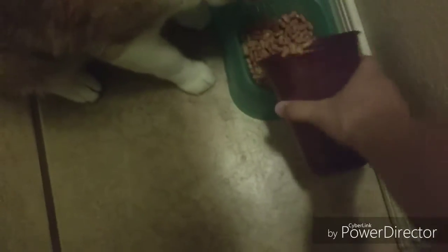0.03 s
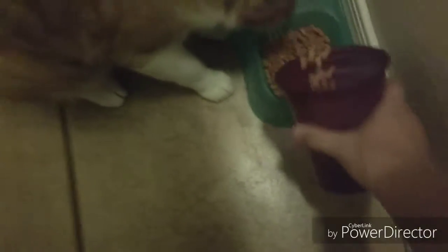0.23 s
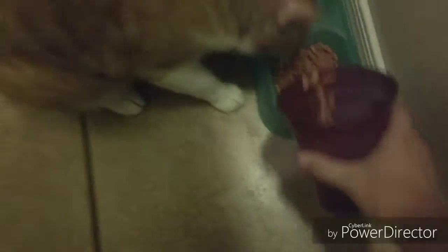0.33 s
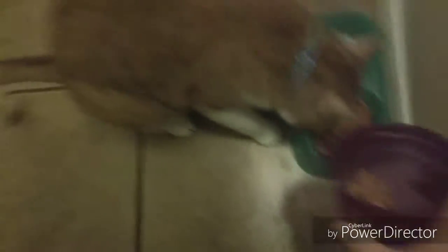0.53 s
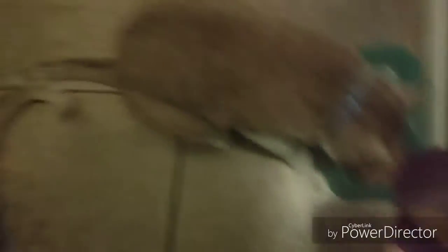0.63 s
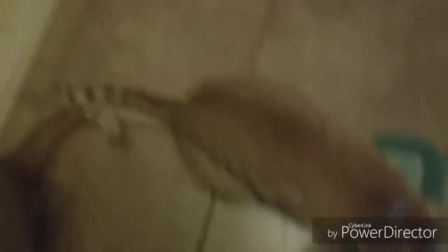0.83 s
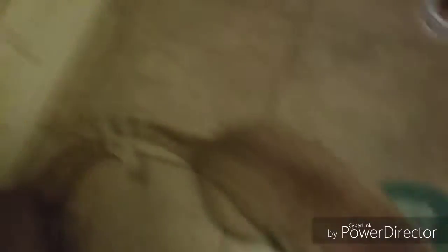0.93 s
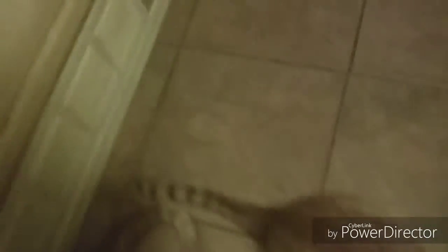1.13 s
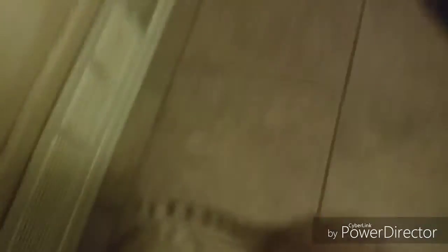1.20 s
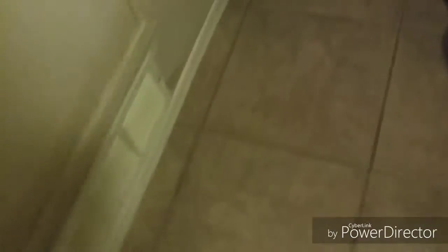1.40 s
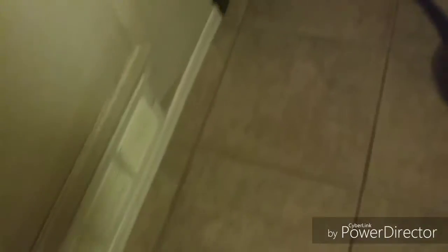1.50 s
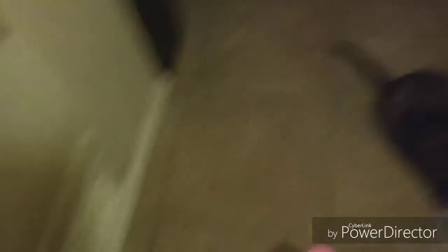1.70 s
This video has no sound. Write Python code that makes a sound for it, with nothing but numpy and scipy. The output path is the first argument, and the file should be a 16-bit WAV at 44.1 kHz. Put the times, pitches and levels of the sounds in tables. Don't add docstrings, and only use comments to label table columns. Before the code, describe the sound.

Dry pellets rattle from a plastic cup into a plastic bowl, starting at once, dipping near 0.2 s, then growing denser. Hollow knocks and hard clacks are strongest at 0.75-0.8 s, with another at 0.96 s. Metal clinks at 0.24, 0.73 and 1.18 s; a tiny tag tinkles near 1.29 s amid gritty foot scuffs. Faint ticks follow from 1.46 to 1.7 s. Close microphone, short tiled echo, faint hiss.

```python
import sys
import numpy as np
from scipy import signal
from scipy.fft import rfft, irfft
from scipy.io import wavfile

SR = 44100
rng = np.random.default_rng(int(sys.argv[2]) if len(sys.argv) > 2 else 0)


def dump(signal):
    limited = np.clip(np.atleast_2d(signal).T, -1, 1)
    pcm = np.round(limited * 32767).astype(np.int16)
    wavfile.write(sys.argv[1], SR, pcm)


def decibels_to_gain(level_db):
    exponent = np.asarray(level_db, float) / 20
    return 10 ** exponent


N = 77175

# pitch_hz [Hz], level_db [dB], t60_s [s to fade by 60 dB]
HOLLOW_MODES = [(586, -9.5, 0.054), (671.7, -4.5, 0.053), (784, -3.5, 0.045), (973, -13, 0.049)]
# pitch_hz [Hz], level_db [dB], t60_s [s]
SNAP_MODES = [(4900, -5, .011), (5600, 2.5, .008), (6250, 2.5, .010)]
# pitch_hz [Hz], level_db [dB], t60_s [s]
RIM_MODES = [(2850, 4, .012), (3350, 6, .014), (4200, 3, .010)]
# pitch_hz [Hz], level_db [dB]
GRIT_COLOUR = [(650, -53), (1100, -11.5), (1420, -16), (1590, -13), (5300, -10), (6120, -0.5),
               (7550, -19.5), (15500, -33)]

CONTACT_S = 0.0003
BODY_FLOOR_HZ, PORT_EDGE_HZ = 530, 6900


def rms_one(x):
    return x / np.sqrt(np.mean(x ** 2) + 1e-20)


def cut(x, hz, kind):
    return signal.sosfilt(signal.butter(4, hz, kind, fs=SR, output="sos"), x)


def coloured(x, points):
    hz, db = np.transpose(points)
    grid = np.maximum(np.fft.rfftfreq(4096, 1 / SR), 10)
    cepstrum = irfft(np.log(decibels_to_gain(np.interp(np.log(grid), np.log(hz), db))))
    cepstrum[1:2048] *= 2
    cepstrum[2049:] = 0
    return signal.fftconvolve(x, irfft(np.exp(rfft(cepstrum))))[:N]


def ring(x, hz, t60):
    r = decibels_to_gain(-60 / (t60 * SR))
    w = 2 * np.pi * min(hz, 0.45 * SR) / SR
    return signal.lfilter([0, np.sin(w)], [1, -2 * r * np.cos(w), r * r], x + 1e-18)


def strike(s, db, modes, contact_s, scatter_db, detune=0, twin=0.77):
    phase_scatter, stagger_s = 0.7, 0.0007
    out = np.zeros(N + SR)
    for hz, level_db, t60 in modes:
        n = np.arange(int(min(1.3 * t60 + 8 * contact_s, 0.9) * SR))
        t = n / SR
        luck = rng.standard_normal((len(s), 5))[:, :, None]
        own_hz = hz * (1 + detune * luck[:, 1])
        twin_hz = own_hz + 6.0 / t60 * luck[:, 3]
        wave = np.sin(2 * np.pi * own_hz * t + phase_scatter * luck[:, 2])
        wave = wave + twin * np.sin(2 * np.pi * twin_hz * t + phase_scatter * luck[:, 4])
        late = stagger_s * rng.random((len(s), 1)) * (detune > 0)
        fade = decibels_to_gain(np.asarray(db)[:, None] + level_db - 6 + scatter_db * luck[:, 0] - 60 * t / t60)
        rise = (1 - np.exp(-t / contact_s)) ** 2
        start = ((np.asarray(s)[:, None] + late) * SR).astype(int)
        np.add.at(out, start + n, wave * fade * rise)
    return out[:N]


def grains(per_s):
    spread_db, clump_db = 3.6, 2.3
    slow = rng.standard_normal(N // 300 + 2)
    clump = rms_one(np.interp(np.arange(N) / 300, np.arange(N // 300 + 2), slow))
    sizes = decibels_to_gain(spread_db * np.minimum(rng.exponential(1, N), 3)) * rng.choice([-1, 1], N)
    return sizes * decibels_to_gain(clump_db * clump) * (rng.random(N) < per_s / SR)


def room(x):
    t60_s, level_db, cut_hz, gap_s = 0.18, -12, 4900, 0.00317
    t = np.arange(SR // 2) / SR
    tail = rng.standard_normal(len(t)) * decibels_to_gain(-60 * t / t60_s) * (t > gap_s)
    tail = signal.sosfilt(signal.butter(1, cut_hz, fs=SR, output="sos"), tail)
    return decibels_to_gain(level_db) * signal.fftconvolve(x, tail / np.linalg.norm(tail))[:N]


def rattle():
    # start_s [s], level_db [dB], hollow_db [dB]
    loudness = [(0, -40.5, -43.5), (.13, -48.5, -68.5), (0.221, -50.5, -65), (.3, -43.5, -60),
                (.45, -42, -52.5), (.5, -47.5, -58), (.6, -40, -49.5), (.7, -42, -53.5), (0.848, -41, -49),
                (.94, -63, -67.5), (1.15, -59, -74), (1.449, -66, -71.5), (1.75, -73.5, -101)]
    # pitch_hz [Hz], level_db [dB]
    pellet_colour = [(590, -8.5), (1000, -12), (1480, -8.5), (1620, -10.5), (3220, -9.5), (4700, -10.5),
                     (6260, -2.5), (8250, -33), (15500, -43.5)]
    pellets_per_s, boom_hits_per_s, ring_cycles = 2000, 350, 18.0
    base_hz, base_db = 380, -17

    hits = grains(pellets_per_s)
    dealt = rng.integers(0, 24, N)
    hush = 0.1 * rng.standard_normal(N)
    rings = np.zeros(N)
    for k, hz in enumerate(np.geomspace(1000, 15500, 24)):
        push = hits * ((dealt - k) % 8 == 0) + hush * hz / 9000
        rings += ring(ring(push, hz, ring_cycles / hz), hz, 3.5 / hz) * hz ** 1.95
    rings = cut(coloured(rings, pellet_colour), BODY_FLOOR_HZ, "high")
    rings = rms_one(rings + decibels_to_gain(-1) * room(rings))

    boom = np.zeros(N)
    for hz, level_db, t60 in HOLLOW_MODES:
        boom += decibels_to_gain(level_db) * ring(ring(grains(boom_hits_per_s), hz, t60), hz, 2.0 / hz) * hz
    base = ring(ring(boom, base_hz, 0.02), base_hz, 0.02)
    base = rms_one(base * cut(rng.standard_normal(N), 60, "low"))
    boom = rms_one(cut(boom, BODY_FLOOR_HZ, "high")) + decibels_to_gain(base_db) * base

    s, db, hollow_db = np.transpose(loudness)
    t = np.arange(N) / SR
    return decibels_to_gain(np.interp(t, s, db) - 3.0) * rings + decibels_to_gain(np.interp(t, s, hollow_db)) * boom


def floor_noise():
    # pitch_hz [Hz], level_db [dB]
    hiss_colour = [(25, -6.5), (120, -5.5), (350, -12), (700, -7), (1100, -19), (4800, -23.5),
                   (6200, -18.5), (7600, -24.5), (15500, -23.5)]
    return decibels_to_gain(-69.5) * rms_one(coloured(rng.standard_normal(N), hiss_colour))


def taps():
    # start_s [s], level_db [dB],
    # pitch_hz [Hz]
    tap_list = [(.001, -42.5, 428), (.045, -42.5, 412), (.145, -51, 380), (.2, -59, 428), (.295, -58, 300),
                (.458, -48.5, 348), (.665, -49, 450), (.676, -51.5, 280), (.748, -46.5, 409),
                (.095, -34, 1430), (0.839, -31.5, 1600), (1.237, -49, 1470), (1.289, -46, 4550),
                (0.039, -38, 1397)]
    t60_s, contact_s = 0.069, 0.0015
    return sum(strike([s], [db], [(hz, 3, t60_s)], contact_s, 0) for s, db, hz in tap_list)


def knocks():
    # start_s [s], level_db [dB], pitch_hz [Hz]
    knock_list = [(0.002, -33, 800), (0.015, -38, 840), (0.092, -32.5, 774), (0.278, -40, 842),
                  (0.361, -43, 690), (0.429, -33, 769), (0.468, -38, 820), (0.507, -40, 847),
                  (0.569, -28, 741), (0.594, -35, 800), (0.668, -33.5, 626), (0.743, -34.5, 653),
                  (0.779, -26.5, 799), (0.799, -25.5, 745), (0.842, -30, 754), (0.964, -28.5, 729),
                  (1.03, -38.5, 745), (1.463, -52.5, 740), (1.581, -53, 722), (1.614, -52, 722),
                  (1.686, -61.5, 713)]
    contact_s = 0.0004
    s, db, _ = np.transpose(knock_list)
    boom = strike(s, db - 4.5, HOLLOW_MODES, contact_s, 3.2, detune=0.0095)
    for at, level_db, own_hz in knock_list:
        boom += strike([at], [level_db], [(own_hz, 1.5, 0.06)], contact_s, 0)
    return cut(boom, BODY_FLOOR_HZ, "high")


def thumps():
    # start_s [s], level_db [dB]
    thump_list = [
        (0.032, -49.5),
        (0.367, -38),
        (0.458, -67),
        (0.681, -50.5),
        (0.787, -50.5),
        (0.964, -57.5),
        (1.679, -62.5),
    ]
    modes = [(125, 0, 0.056), (300, 0, 0.07)]  # (Hz, dB, t60 s)
    return cut(strike(*np.transpose(thump_list), modes, 0.004, 0), 100, "high")


def pellets():
    # start_s [s], level_db [dB], pitch_hz [Hz]
    pellet_list = [(0.0334, -32, 5167), (0.0357, -37, 4340), (0.0509, -47, 6000), (0.162, -43, 2160),
                   (0.2022, -34, 6100), (0.253, -28, 5730), (0.2745, -23, 6280), (0.3032, -35, 3273),
                   (0.3622, -41, 1555), (0.3625, -36, 4900), (0.3847, -30, 4980), (0.3865, -29, 3960),
                   (0.4006, -44, 3360), (0.4157, -40, 2460), (0.4522, -34, 6080), (0.4792, -46, 2380),
                   (0.5077, -37, 6201), (0.5096, -38, 4020), (0.5093, -46, 2430), (0.545, -36.5, 4478),
                   (0.5487, -30.5, 6190), (0.5628, -39, 4970), (0.5777, -31.5, 3100), (0.5762, -33, 4380),
                   (0.5808, -28.5, 4190), (0.594, -37.5, 3100), (0.6106, -34.5, 4478),
                   (0.6206, -35.5, 3320), (0.6305, -31.5, 5857), (0.6372, -36.5, 5770),
                   (0.6615, -25.5, 5870), (0.6635, -38, 4651), (0.668, -34, 1722), (0.668, -35, 5684),
                   (0.6703, -33, 3260), (0.6804, -31, 6029), (0.7104, -38.5, 3310), (0.7315, -38, 6201),
                   (0.7348, -38, 4306), (0.7631, -23, 3950), (0.764, -24, 6201), (0.7675, -32, 3445),
                   (0.809, -27, 5380), (0.82, -27, 5350), (0.8224, -34, 2820), (0.9387, -46, 6300),
                   (0.9748, -42, 1870), (1.0425, -42, 1710), (1.0577, -46, 6500), (1.0646, -34, 6320),
                   (1.2603, -39.5, 4800), (1.2659, -48, 4580), (1.2667, -45, 5650), (1.3229, -43.5, 3660),
                   (1.3487, -42, 3617), (1.3523, -29.5, 6580)]
    cycles, lift_db = 41, 6
    out = np.zeros(N)
    for s, db, hz in pellet_list:
        modes = [(hz, 3, cycles / hz), (hz * 0.859, -6, cycles / hz)]
        out += strike([s], [db + lift_db], modes, CONTACT_S, 0)
    return cut(out, PORT_EDGE_HZ, "low")


def clacks():
    # start_s [s], snap_db [dB], wall_db [dB], rim_db [dB], air_db [dB]
    clack_list = [(0.07, -34, -67, -60, -75), (0.092, -37, -31.5, -42, -92), (0.1478, -29, -46, -40, -77),
                  (0.2889, -22, -38, -33.5, -50), (0.3612, -37, -53, -64, -43.5),
                  (0.3685, -20.5, -36.5, -28.5, -39.5), (0.4284, -49, -39, -37, -76),
                  (0.4676, -29, -38, -38, -51), (0.5372, -18.5, -78, -30.5, -49),
                  (0.5652, -40, -34, -37, -70), (0.608, -28.5, -40.5, -33, -86),
                  (0.7524, -5, -35.5, -18, -54.5), (0.795, -7.5, -29, -19.5, -46),
                  (0.839, -24.5, -30.5, -29.5, -89), (0.868, -26.5, -42.5, -49, -70),
                  (0.889, -29, -77, -42, -61), (0.9631, -16.5, -31.5, -23.5, -48.5),
                  (1.0299, -35, -33, -37, -66)]
    # start_s [s], snap_db [dB], wall_db [dB], rim_db [dB], air_db [dB]
    faint_list = [
        (1.0893, -36.5, -63, -53, -54),
    ]
    # pitch_hz [Hz], level_db [dB], t60_s [s]
    wall_modes = [(1493, 2, 0.028), (1671, -4.5, 0.036), (1915, 6.5, 0.017), (2287, 2.5, 0.025)]
    # pitch_hz [Hz], level_db [dB], t60_s [s]
    air_modes = [(8500, 8, .004), (10500, 8, .004), (12500, 8, .004), (14500, 8, .004)]
    s, *levels = np.transpose(clack_list + faint_list)
    parts = []
    for db, modes in zip(levels, (SNAP_MODES, wall_modes, RIM_MODES, air_modes)):
        parts.append(strike(s, db, modes, CONTACT_S, 2.0, detune=0.024))
    snap, wall, rim, air = parts
    return air + cut(cut(snap + wall + rim, PORT_EDGE_HZ, "low"), BODY_FLOOR_HZ, "high")


def clinks():
    # start_s [s], level_db [dB], spray_db [dB]
    clink_list = [
        (0.2365, -23.5, 0),
        (0.7255, -21, -1.5),
        (1.178, -26, -1),
    ]
    # pitch_hz [Hz], level_db [dB], t60_s [s]
    first_modes = [(1442, -12.5, 0.066), (2200, -10.5, 0.074), (3220, -15, 0.082), (4307, -7, 0.053),
                   (5087, -9, 0.074), (5710, 1, 0.073), (6191, -4, 0.054), (7130, 4.5, 0.037),
                   (8840, -3.5, 0.022), (10740, -8, 0.018), (13000, -2, 0.021), (13600, -7, .017),
                   (14900, -6, .015)]
    # pitch_hz [Hz], level_db [dB], t60_s [s]
    second_modes = [(4070, -5.5, 0.052), (6390, 0.5, 0.043), (6800, 7.5, 0.016), (8400, -35, .04)]
    # pitch_hz [Hz], level_db [dB], t60_s [s]
    last_modes = [(419, -25, 0.19), (1041, -20.5, .1), (1348, -23.5, 0.25), (2338, -9, 0.21),
                  (2200, -16, 0.12), (5030, -24, .08), (5826, 1, 0.09), (6245, -7.5, 0.2),
                  (6870, 3.5, 0.025), (7530, -18, 0.22), (8340, -23, .12), (9442, -21.5, 0.15),
                  (13500, 2.5, 0.013)]
    # pitch_hz [Hz], level_db [dB], t60_s [s]
    swell_modes = [(3130, -1, .3), (3345, -6.5, 0.19)]
    contact_s, swell_s = 0.0014, 0.008
    spray_level_db, spray_t60_s = -15.5, 0.13
    muted_s, mute_t60_s = 1.25, 0.18

    out, t = np.zeros(N), np.arange(N) / SR
    for (s, db, spray_db), modes in zip(clink_list, (first_modes, second_modes, last_modes)):
        out += strike([s], [db], modes, contact_s, 0, twin=0.6)
        spray = coloured(rng.standard_normal(N), GRIT_COLOUR)
        spray = rms_one(coloured(spray, [(7000, 0.0078), (9000, 8.5)]))
        fade_db = -60 * np.maximum(t - s, 0) / spray_t60_s
        out += spray * (t >= s) * decibels_to_gain(db + spray_db + spray_level_db + fade_db)
    last_s, last_db, _ = clink_list[-1]
    out += strike([last_s], [last_db], swell_modes, swell_s, 0, twin=0)
    return out * decibels_to_gain(-60 * np.maximum(t - muted_s, 0) / mute_t60_s)


def tinkles():
    # start_s [s], level_db [dB], pitch_hz [Hz]
    tinkle_list = [
        (0.3277, -58, 10500),
        (0.3466, -49, 10600),
        (0.3944, -49, 10650),
        (0.4005, -51, 10700),
        (1.288, -38.5, 11320),
    ]
    t60_s, contact_s = 0.027, 0.0014
    out = np.zeros(N)
    for s, db, hz in tinkle_list:
        modes = [(hz, 4, t60_s), (hz * 9 / 8, -9, t60_s / 2)]
        out += strike([s], [db], modes, contact_s, 0)
    return out


def ticks():
    # start_s [s], level_db [dB], pitch_hz [Hz]
    tick_list = [
        (1.0294, -27.5, 6420),
        (1.462, -54.5, 1750),
        (1.501, -55.5, 6400),
        (1.506, -59, 6270),
        (1.513, -52, 6500),
        (1.614, -46.5, 1820),
        (1.617, -54, 2530),
        (1.677, -49.5, 2956),
        (1.687, -51, 1773),
    ]
    t60_s, crack_db = 0.019, -2
    out = np.zeros(N)
    for s, db, hz in tick_list:
        out += strike([s], [db], [(hz, 3, t60_s)], CONTACT_S, 0)
        out += strike([s], [db + crack_db], RIM_MODES + SNAP_MODES, CONTACT_S, 4.8) / 4
    return cut(out, BODY_FLOOR_HZ, "high")


def scuffs():
    # middle_s [s], half_length_s [s], level_db [dB]
    scuff_list = [
        (1.265, 0.016, -49),
        (1.297, 0.0083, -50),
        (1.337, 0.017, -46),
        (1.384, 0.019, -59),
    ]
    t = np.arange(N) / SR
    swell = sum(decibels_to_gain(db) * np.exp(-0.5 * ((t - s) / half) ** 2) for s, half, db in scuff_list)
    grit = grains(3000) + 0.43 * rng.standard_normal(N)
    return swell * rms_one(coloured(grit, GRIT_COLOUR))


def scene():
    plastic = taps() + knocks() + pellets() + clacks() + ticks()
    bright = clinks() + tinkles()
    echo = room(plastic + decibels_to_gain(-4.5) * bright)
    mix = rattle() + floor_noise() + thumps() + plastic + bright + scuffs() + echo
    return mix[None]


def low_pass(x):
    return signal.sosfilt(signal.butter(12, 16410, fs=SR, output="sos"), x)


def record(dry):
    top_cut = signal.cheby2(10, 25, 15750, fs=SR, output="sos")
    finished = signal.sosfilt(top_cut, dry) - 0.0005
    return low_pass(finished)


dry = scene()
out = record(dry)
dump(out)
```